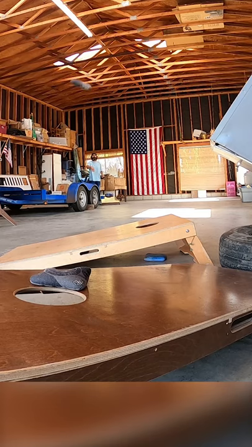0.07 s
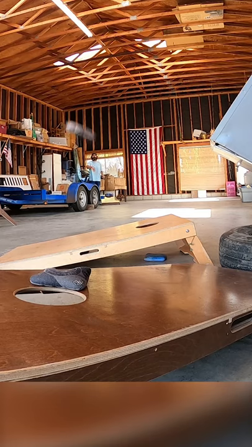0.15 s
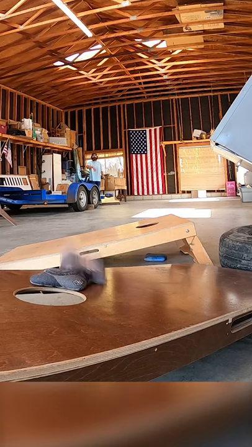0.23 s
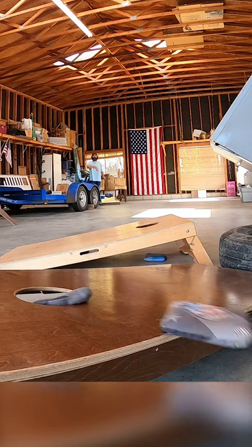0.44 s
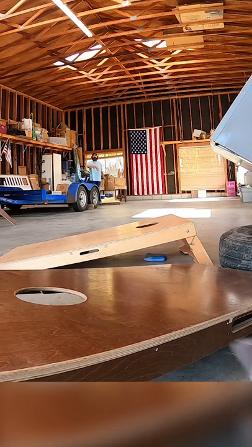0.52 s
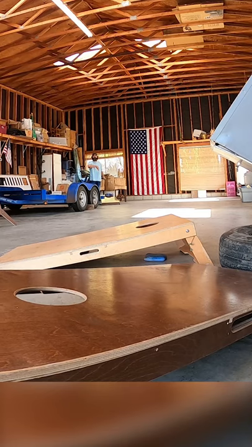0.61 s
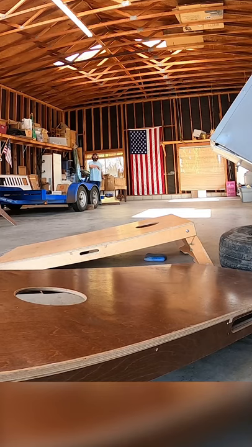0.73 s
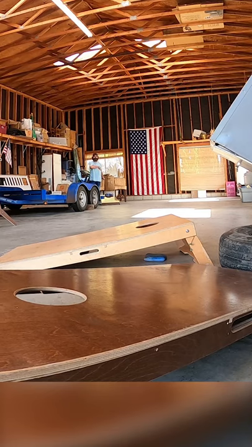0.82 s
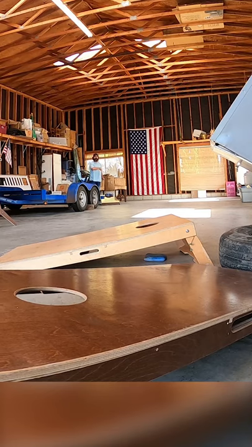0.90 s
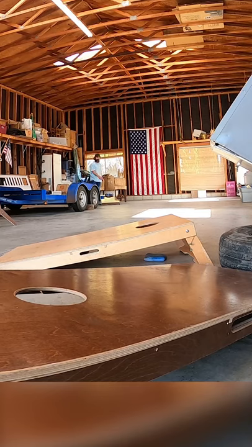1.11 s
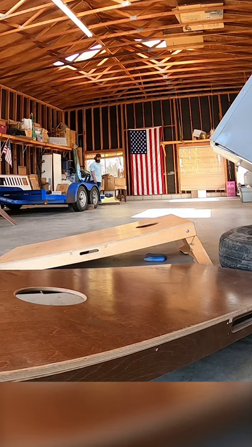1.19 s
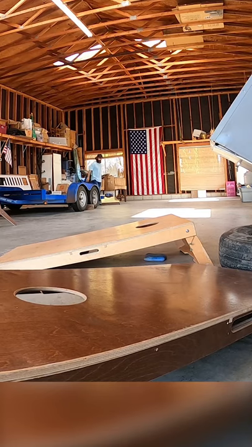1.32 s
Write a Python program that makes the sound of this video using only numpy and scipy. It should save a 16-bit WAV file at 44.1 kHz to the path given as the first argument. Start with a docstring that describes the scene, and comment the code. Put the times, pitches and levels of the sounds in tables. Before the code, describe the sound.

A beanbag slaps onto a hollow wooden board, rattling it, in an echoing garage.

```python
"""Beanbag on a plywood board

A beanbag slaps onto a hollow board right by the microphone, in a big timber garage. Its pellets crunch;
the board booms, hops and knocks back on its legs. The bag slides off and a bag drops on the concrete.
A soft bump off to the right and two faint bird chirps follow, over a murmur from outdoors."""
import sys
import numpy as np
from scipy import signal
from scipy.fft import rfft, irfft
from scipy.io import wavfile
from scipy.ndimage import uniform_filter1d

SR = 44100
rng = np.random.default_rng(int(sys.argv[2]) if len(sys.argv) > 2 else 0)


def pcm_store(signal):
    """Save signal as 16-bit PCM."""
    levels = np.round(np.clip(np.atleast_2d(signal), -1, 1) * 32767)
    wavfile.write(sys.argv[1], SR, levels.astype(np.int16).T)


N = 59535


# The hollow board, close up. Each row: mode in Hz, level in dB, t60 in seconds.
BOARD_MODES = [(59, -40, 0.046), (94, -10, .2), (147.1, -9.5, 0.44), (168.8, -8, 0.076), (197, -17.5, 0.2),
               (246.7, -21, 0.33), (264.2, -28, 0.15), (344.5, -16.5, 0.24), (390.5, -21.5, 0.24),
               (459, -32, 0.2), (539, -38.5, 0.35), (636.4, -29.5, 0.26), (696.6, -32.5, 0.4)]
# The bag's weight, then the legs knocking back.
# Each row: start in seconds, level in dB, contact in ms, bass cut in Hz.
BOARD_BLOWS = [(0.2518, -3.5, 2.2, 90), (0.2684, 7.5, 9.3, 27.2), (0.2868, -10.5, 1.6, 122),
               (0.3056, 5, 2.12, 200), (0.3134, -3.7, 2.5, 177), (0.3299, -6, 1.3, 165),
               (0.3346, -10.5, 2.2, 142), (0.3701, -11, 6.4, 158)]

def board():
    """Blows drive the board's modes, which waver under the sliding bag; long contacts are duller."""
    hz = np.fft.rfftfreq(N, 1 / SR)
    push = 0
    for start, db, contact_ms, cut_hz in BOARD_BLOWS:
        softness = 1 / (1 + (hz * contact_ms / 1000) ** 2)
        bass_cut = hz ** 2 / (hz ** 2 + cut_hz ** 2)  # stiff legs give little bass
        push += undb(db) * softness * bass_cut * np.exp(-2j * np.pi * hz * start)
    return convolve(irfft(push, N), ring(BOARD_MODES, waver=.03))


# Cloth and pellets on the wood. Each row: peak in seconds, level in dB, attack and decay in seconds.
SLAP_BURSTS = [(.2468, -16.5, 0.00095, 0.0023), (.2502, -11.5, 0.0023, 0.0043), (.257, -17, 0.0007, 0.011)]
# Hard ticks within the slap. Each row: time in seconds, relative level in dB.
SLAP_TICKS = [(.249, 1.5), (0.258, -3), (0.2635, -9)]
# The slap's tone at the microphone. Each row: frequency in Hz, relative level in dB.
SLAP_COLOUR = [(100, 1.5), (400, -2.5), (700, -3), (1100, 2), (1400, -1.5), (2600, 1.5), (3400, -6),
               (5000, -9.5), (8000, -21), (12000, -29), (15500, -52)]
# The plywood's upper ring, and its crack as the bag lands flat.
# Each row: mode in Hz, level in dB, t60 in seconds.
PLYWOOD_MODES = [(890, -17.5, 0.075), (1115, -23, 0.05), (1605, -28, 0.055), (2120, -27, .04),
                 (2345, -22, 0.045), (3200, -28, .04), (4257, -31, .025), (5010, -32, .02)]
CRACK_MODES = [(1130, -7.5, .012), (2530, -2.5, .011)]

def slap():
    """Pellets crunch on the plywood and hard ticks ring it briefly; the finest grains scatter wide."""
    pellets, ticks = bursts(SLAP_BURSTS, grain_db=4.5), np.zeros(N)
    for start, db in SLAP_TICKS:
        ticks[int(start * SR)] = undb(db)
    smack = colour(pellets + undb(-10) * ticks, SLAP_COLOUR)
    smack += convolve(ticks + undb(-36.5) * pellets, strike(0, PLYWOOD_MODES, rise_s=.00044))
    smack += strike(.2481, CRACK_MODES, rise_s=.0005)
    smack[int(.2638 * SR)] += undb(-19)  # a last bright snap of the cloth
    grains = bursts(SLAP_BURSTS, grain_db=9)
    scatter = colour(grains, [(300, -8), (3000, 6.5), (6000, 2), (15000, -17)])
    return place(smack, pan_db=0, angle=1, treble_pan_db=-1) + undb(-17.5) * sideways(scatter)


# The frame rattling and a leg's hard edge clacking down, close by.
# Each row: peak in seconds, level in dB, attack and decay in seconds.
RATTLE_BURSTS = [(.288, -21.5, 0.0085, 0.017), (.303, -16.5, 0.0052, 0.016), (.329, -25.5, 0.0035, 0.0099),
                 (.372, -27.5, 0.004, 0.099)]
CLACK_BURSTS = [(.3004, -24, .0006, .004)]
# Their tones. Each row: frequency in Hz, relative level in dB.
RATTLE_COLOUR = [(60, -5), (190, 2), (370, 5), (720, -1.5), (1050, -1.5), (1400, -7), (1900, -15),
                 (2700, -35.5), (15000, -63)]
CLACK_COLOUR = [(400, -13), (1000, 21), (1400, -6), (1950, -1), (2800, -32), (15000, -76)]
# The leg's ring. Each row: mode in Hz, level in dB, t60 in seconds.
LEG_MODES = [(1002, -14.5, 0.031), (1874, -15, 0.015)]

def legs():
    """The hopping board rattles its legs and frame; one leg clacks down and rings."""
    rattle = colour(bursts(RATTLE_BURSTS, grain_db=3), RATTLE_COLOUR)
    clack = colour(bursts(CLACK_BURSTS, grain_db=1.5), CLACK_COLOUR)
    return rattle + clack + strike(CLACK_BURSTS[0][0], LEG_MODES, rise_s=.0011)


# Cloth on the board, then its edge. Each row: peak in seconds, level in dB, attack and decay in seconds.
SLIDE_BURSTS = [(.388, -39, 0.026, 0.071), (.6, -31.5, 0.012, 0.014)]
# The rubbing's tone. Each row: frequency in Hz, relative level in dB.
SLIDE_COLOUR = [(100, -15), (700, -5), (1000, 5.5), (1350, -5.5), (1650, 1.5), (2600, 0), (3700, -2.5),
                (6000, -12), (10000, -21.5), (15000, -32)]

def slide():
    """The bag rubs across the board and slips off, a little left of the microphone."""
    rub = cloth(SLIDE_BURSTS, SLIDE_COLOUR, spread_db=-5.5)
    return place(rub, pan_db=4.5, angle=.49, treble_pan_db=-9)


# A bag on the garage floor. Each row: peak in seconds, level in dB, attack and decay in seconds.
DROP_BURSTS = [(.6772, -28.5, 0.00092, 0.003), (.682, -27, 0.002, 0.0071)]
# The thud and smack of its weight. Each row: mode in Hz, level in dB, t60 in seconds.
THUD_MODES = [(92.2, -27.5, 0.1), (1360, -22.5, 0.02)]
# Its tone, direct and off nearby surfaces. Each row: frequency in Hz, relative level in dB.
DROP_COLOUR = [(40, -5.5), (110, 2), (450, -7), (1400, -0.5), (1900, -3.5), (2600, 0), (3200, -2.5),
               (5200, -12), (9000, -19.5), (15000, -27.5)]
REFLECTION_COLOUR = [(200, -27), (700, -17), (1600, -7), (3000, -22), (15000, -15)]
# Bounces off those surfaces. Each row: delay in seconds, level in dB.
REFLECTIONS = [(0.0209, -17), (.044, -21)]

def drop():
    """A bag hits the concrete; nearby surfaces throw the sound back."""
    hit = cloth(DROP_BURSTS, DROP_COLOUR, spread_db=.5)
    hit += strike(DROP_BURSTS[0][0], THUD_MODES, rise_s=.0005)
    bounce = colour(hit, REFLECTION_COLOUR)
    echoes = sum(undb(db) * np.roll(bounce, int(delay * SR), axis=1) for delay, db in REFLECTIONS)
    return place(hit + echoes, pan_db=.1, angle=1, treble_pan_db=-5)


# A soft bump. Each row: peak in seconds, level in dB, attack and decay in seconds.
BUMP_BURSTS = [(.805, -42.5, 0.0037, 0.011)]
# Its ring, off to the right. Each row: mode in Hz, level in dB, t60 in seconds.
BUMP_MODES = [(237.7, -36, 0.19), (487, -46, 0.07), (745, -34, 0.033)]
# Its dull tone. Each row: frequency in Hz, relative level in dB.
BUMP_COLOUR = [(100, -4), (400, 9), (750, -7), (1400, -2), (3000, -9), (15000, -53)]

def bump():
    """A dull knock that leaves one low note."""
    note = place(strike(.806, BUMP_MODES, rise_s=.0036), pan_db=-9, angle=.91)
    return note + colour(bursts(BUMP_BURSTS, grain_db=-1.5), BUMP_COLOUR)


# A bird, faint at the microphone.
# Each row: start and length in seconds, first and last pitch in Hz, level in dB.
CHIRPS = [(0.818, 0.049, 3625, 3655, -54.5), (0.862, 0.036, 3910, 3380, -55)]

def bird():
    """Short gliding whistles, slightly hoarse from a jitter in pitch."""
    t, song = times(), 0
    jitter = uniform_filter1d(rng.standard_normal(N), size=120)
    for start, length, first_hz, last_hz, db in CHIRPS:
        progress = np.clip((t - start) / length, 0, 1)
        hz = (first_hz + (last_hz - first_hz) * progress) * (1 + .016 * jitter / jitter.std())
        song += undb(db) * np.sin(np.pi * progress) ** 2 * np.sin(2 * np.pi * np.cumsum(hz) / SR)
    return song


# The big timber garage. Each row: frequency in Hz, t60 in seconds.
GARAGE_T60 = [(100, 0.93), (400, 0.87), (1500, 0.57), (4000, 0.85), (8000, 0.77), (14000, 1.3)]
# Its echo at the microphone. Each row: frequency in Hz, band level in dB.
GARAGE_LEVELS = [(60, -9.5), (200, -14.5), (500, -5.5), (1200, -11), (2500, -12), (5000, -6.5), (9000, -8),
                 (15000, -17)]

def garage(sound, build_s=.014):
    """A dense echo builds up among the rafters; each half-octave band fades at its own rate."""
    t, noise, response = times(), rfft(diffuse()), 0
    octave = np.log2(np.maximum(np.fft.rfftfreq(N, 1 / SR), 1))
    for hz in 31.25 * 2 ** np.arange(0, 9.5, .5):
        band = irfft(noise * np.maximum(1 - 2 * abs(octave - np.log2(hz)), 0), N)
        fade = (1 - np.exp(-t / build_s)) * np.exp(-np.log(1000) * t / at_hz(GARAGE_T60, hz))
        response += band * fade / np.sqrt(np.sum(fade ** 2)) * undb(at_hz(GARAGE_LEVELS, hz))
    return place(convolve(sound, response), pan_db=1.5, angle=.6)


# The far murmur and its hiss. Each row: frequency in Hz, relative level in dB.
MURMUR_COLOUR = [(15, -19.5), (28, 4.5), (60, 0), (110, -4.5), (160, -2), (220, -7.5), (330, -14),
                 (550, -19), (800, -15.5), (1080, -6.5), (1500, -14.5), (2100, -22.5), (3200, -33),
                 (5000, -46.5), (15000, -72)]
HISS_COLOUR = [(500, -21), (3000, 10.5), (6000, -1), (10000, -15), (15000, -41)]
# Their rise and fall. Each row: time in seconds, level in dB.
MURMUR_LEVELS = [(0, -43), (.2, -42), (.4, -44.5), (.9, -50), (1.35, -48)]
HISS_LEVELS = [(0, -71.5), (.5, -56.5), (1.15, -94), (1.22, -69), (1.35, -71)]

def outdoors():
    """Distant rumble and murmur through the open door, a little to the left, with a thin hiss."""
    murmur = colour(diffuse(), MURMUR_COLOUR) * curve(MURMUR_LEVELS)
    hiss = colour(diffuse(), HISS_COLOUR) * curve(HISS_LEVELS)
    return place(murmur + hiss, pan_db=3.5, angle=.78)


# Stereo width at the microphone. Each row: frequency in Hz, side against mid in dB.
WIDTH = [(50, -28), (200, -30), (500, -11.5), (1200, -7), (2500, -4.5), (5000, -0.5), (12000, 2.5)]

def diffuse():
    """Noise from all around: alike at both microphone ports in the bass, unrelated in the treble."""
    mid, side = rfft(rng.standard_normal((2, N)))
    width = undb(at_hz(WIDTH, np.fft.rfftfreq(N, 1 / SR)))
    return irfft(np.array([mid + width * side, mid - width * side]) / np.sqrt(1 + width ** 2), N)


def cloth(rows, shape, spread_db):
    """A bag rubbing or landing: pellet noise, wider in the treble."""
    side = colour(colour(bursts(rows, grain_db=3), WIDTH), shape)
    mid = colour(bursts(rows, grain_db=1), shape)
    return mid + undb(spread_db) * sideways(side)


# The microphone's left port trails its right. Each row: frequency in Hz, lag in radians at angle 1.
PORT_LAG = [(60, 0.067), (200, 0.1), (500, 0.23), (1200, 0.43), (2700, 0.59), (6000, 1), (12000, 0.11)]

def place(sound, pan_db, angle, treble_pan_db=0):
    """Two microphone ports: a level difference (positive is left) and a lag that grows with angle."""
    hz = np.fft.rfftfreq(N, 1 / SR)
    left, right = rfft(np.broadcast_to(sound, (2, N)))
    pan = pan_db + treble_pan_db * hz / (hz + 6000)
    shift = undb(pan / 2) * np.exp(-.5j * angle * at_hz(PORT_LAG, hz))
    return irfft(np.array([left * shift, right / shift]), N)


def sideways(sound):
    """Opposite polarity left and right, heard as width."""
    return sound * np.array([[1], [-1]])


def ring(modes, waver=0, waver_s=.025):
    """The fading tones of a struck object; each drifts on its own by about `waver` of its pitch."""
    t, tones = times(), 0
    for hz, db, t60 in modes:
        drift = uniform_filter1d(rng.standard_normal(N), int(waver_s * SR))
        clock = t + waver * np.cumsum(drift / drift.std() * (1 - np.exp(-t / t60))) / SR
        tones += undb(db) * np.cos(2 * np.pi * hz * clock) * np.exp(-np.log(1000) * t / t60)
    return tones


def strike(start_s, modes, rise_s):
    """One blow: the modes swell during the contact, then fade."""
    t = times()
    return np.interp(t - start_s, t, ring(modes) * (1 - np.exp(-t / rise_s)), left=0)


def bursts(rows, grain_db):
    """Dense ticks, uneven by grain_db, that swell to each row's peak and die away."""
    t, power = times(), 0
    for peak, db, attack, decay in rows:
        falloff = np.where(t < peak, ((t - peak) / attack) ** 2 / 2, (t - peak) / decay)
        power += (undb(db) * np.exp(-falloff)) ** 2
    ticks = rng.choice([-1, 1], N) * undb(grain_db * rng.standard_normal(N))
    return np.sqrt(power) * ticks / ticks.std()


def colour(sound, shape):
    """Causal filter with a (Hz, dB) shape; white noise keeps its level."""
    size = 8192
    gain = undb(at_hz(shape, np.fft.rfftfreq(size, 1 / SR)))
    cepstrum = irfft(np.log(gain / np.sqrt(np.mean(gain ** 2))))
    cepstrum[1:size // 2] *= 2  # fold to minimum phase
    cepstrum[size // 2 + 1:] = 0
    return convolve(sound, irfft(np.exp(rfft(cepstrum))))


def convolve(sound, response):
    """Pass a sound through a response."""
    return irfft(rfft(sound, 2 ** 17) * rfft(response, 2 ** 17))[..., :N]


def curve(points):
    """Gain over time from (s, dB) points."""
    return undb(np.interp(times(), *np.array(points, float).T))


def at_hz(points, hz):
    """Read (Hz, value) points on a log-frequency axis."""
    freqs, values = np.array(points, float).T
    return np.interp(np.log(np.maximum(hz, 1)), np.log(freqs), values)


def undb(db):
    """Decibels to gain."""
    return 10 ** (np.asarray(db) / 20)


def times():
    """Each sample's time in seconds."""
    return np.arange(N) / SR


def scene():
    """All that reaches the microphone: each source, its share of the echo, and the outdoors."""
    wood = place(board() + legs(), pan_db=.5, angle=1)
    hit = slap() + wood
    rub, landing, chirps, knock = slide(), drop(), bird(), bump()
    into_room = hit + rub + undb(-2) * landing + undb(-2.5) * knock + undb(3.5) * chirps
    return hit + rub + landing + knock + chirps + garage(into_room.mean(axis=0)) + outdoors()


def record(dry):
    """The recorder clips peaks at full scale and cuts the top above 15.2 kHz."""
    lowpass = signal.ellip(8, .2, 80, 15200, fs=SR, output="sos")
    return signal.sosfilt(lowpass, np.clip(dry, -1, 1))


dry = scene()
out = record(dry)
pcm_store(out)
```